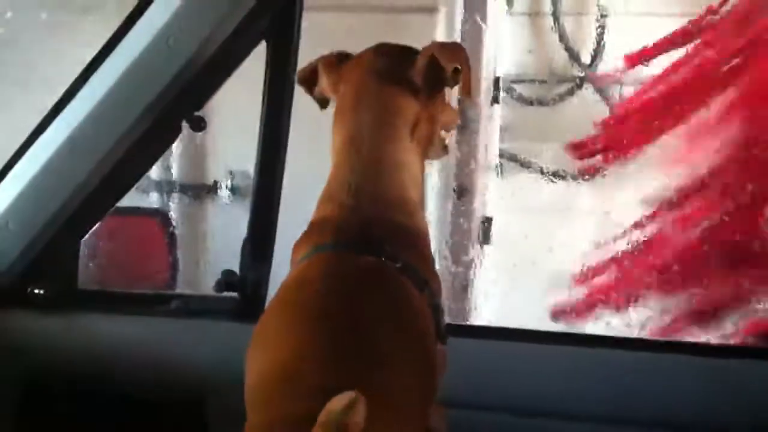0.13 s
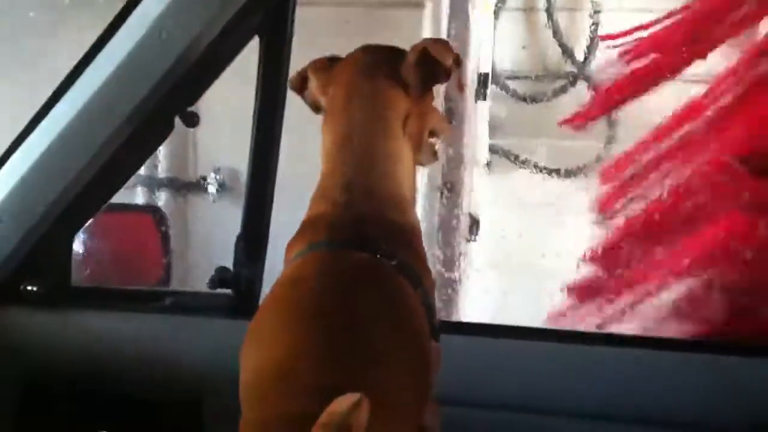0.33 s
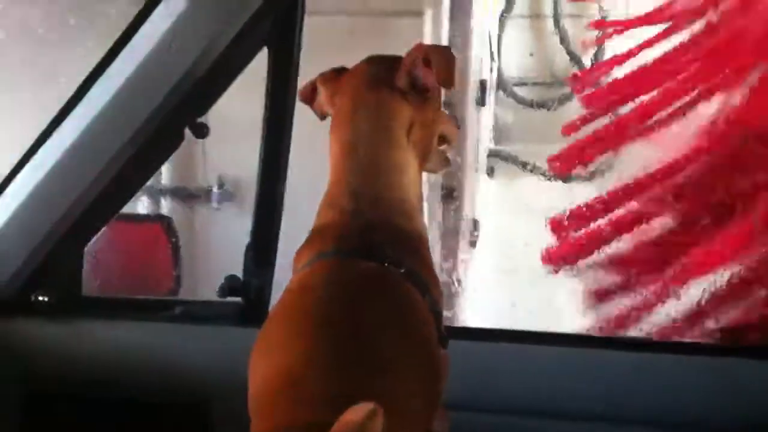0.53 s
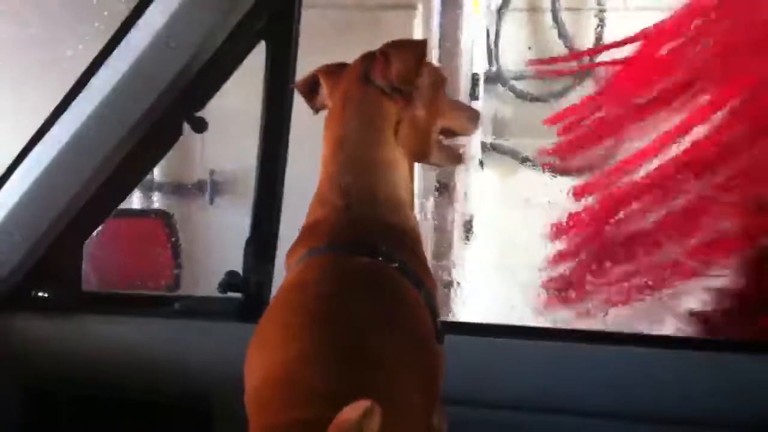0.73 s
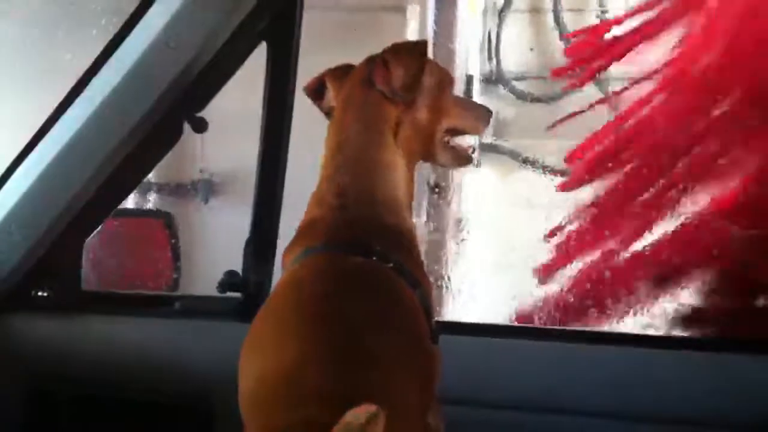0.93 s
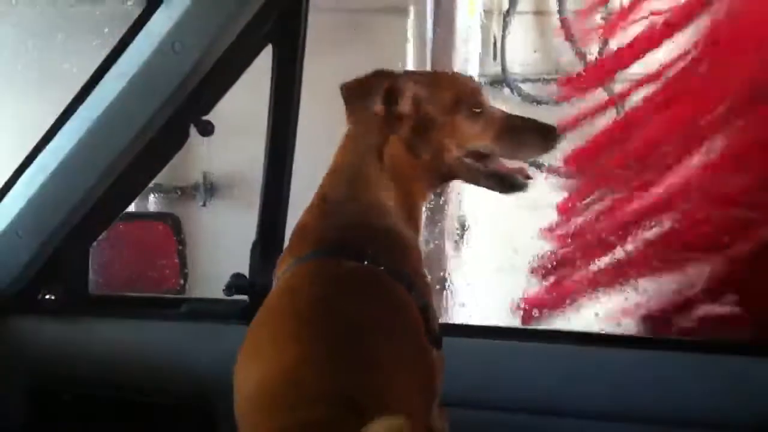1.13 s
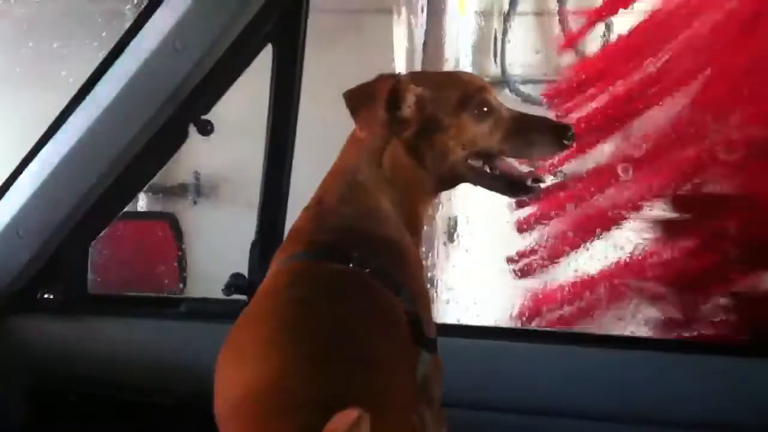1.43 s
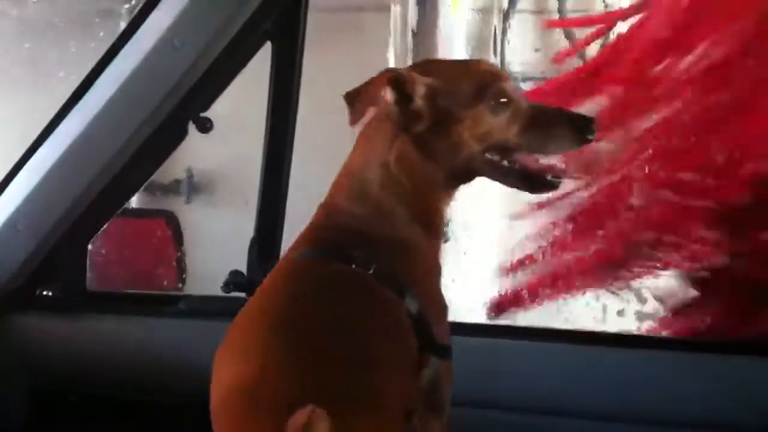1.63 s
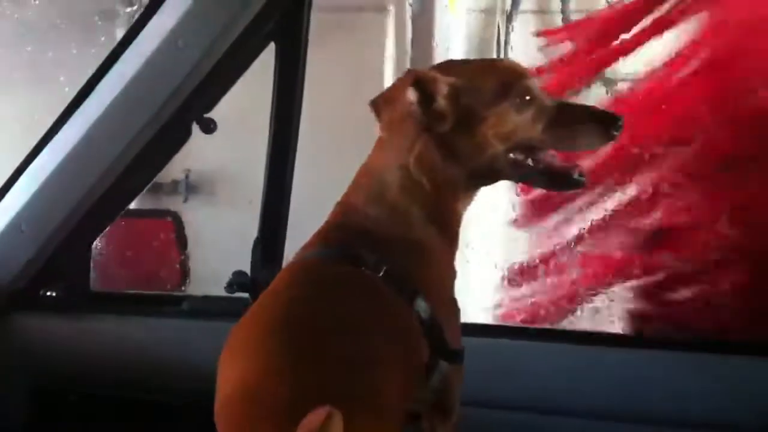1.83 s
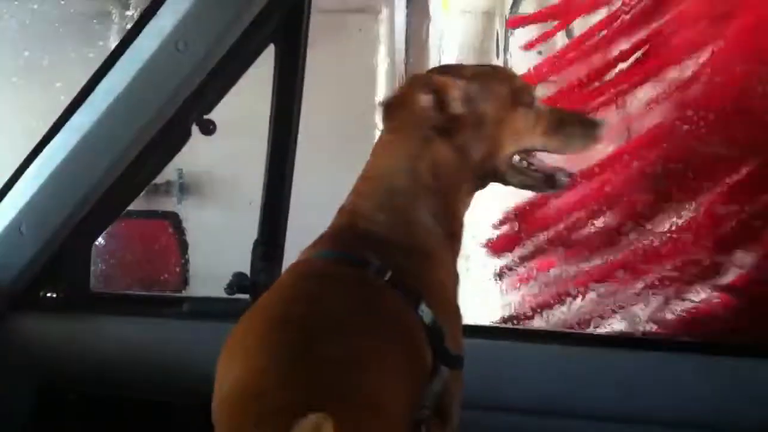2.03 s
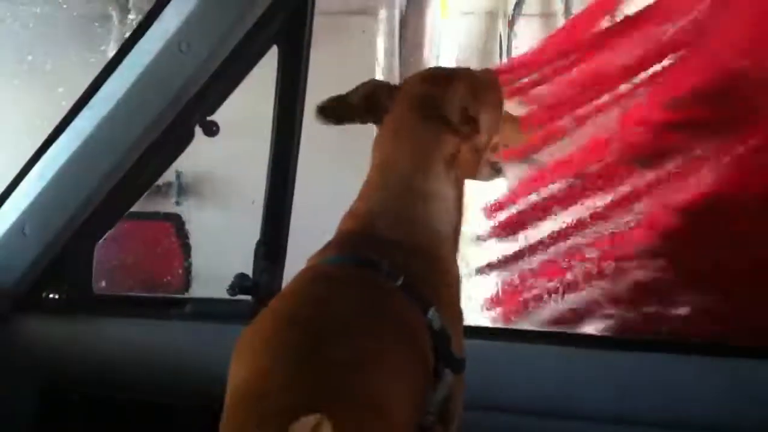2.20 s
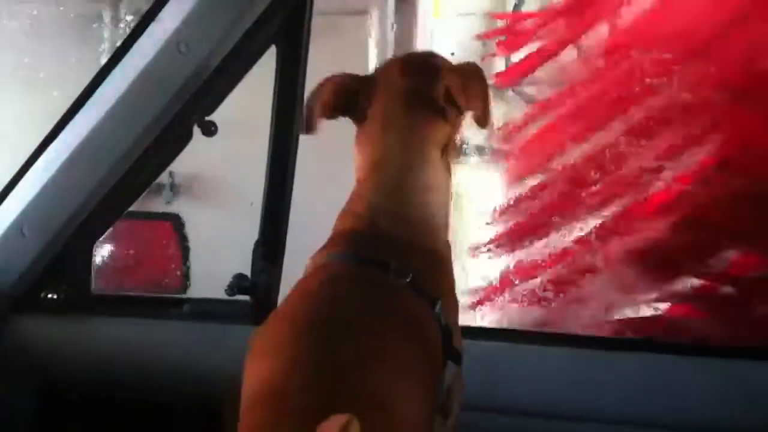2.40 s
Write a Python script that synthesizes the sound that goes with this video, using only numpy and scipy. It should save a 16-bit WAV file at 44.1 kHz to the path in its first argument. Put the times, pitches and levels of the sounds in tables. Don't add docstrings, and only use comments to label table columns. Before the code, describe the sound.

A car wash brush drums softly and rapidly on the door panels, with booming thumps, wet slaps on the windows, hissing spray and dull machinery roar, picked up by a small phone microphone inside the closed cabin.

```python
import sys
import numpy as np
from scipy import signal
from scipy.fft import rfft, irfft
from scipy.io import wavfile
from scipy.ndimage import uniform_filter1d

SR = 44100
rng = np.random.default_rng(int(sys.argv[2]) if len(sys.argv) > 2 else 0)


def volts_from_db(level):
    exponent = np.asarray(level, float) / 20
    return 10 ** exponent


def unload_wav(signal):
    wavfile.write(
        sys.argv[1],
        SR,
        np.round(np.clip(np.atleast_2d(signal).T, -1, 1) * 32767).astype(np.int16),
    )


N = 112896


def in_time(rows, column=1):
    rows = np.array(rows)
    return np.interp(np.arange(N) / SR, rows[:, 0], rows[:, column])


def rms_one(x):
    return x / np.sqrt(np.mean(x ** 2) + 1e-20)


def evened(x):
    window = int(0.05 * SR)
    power = uniform_filter1d(uniform_filter1d(x ** 2, window), window)
    share = 0.55
    return rms_one(x / (power + 1e-20) ** (share / 2))


def drift(rate_hz):
    r = np.exp(-80 * np.pi * rate_hz / SR)
    noise = rng.standard_normal(N // 40 + 2002)
    slow = signal.lfilter([1], [1, -2 * r, r * r], noise)[2000:]
    return np.interp(np.arange(N) / 40, np.arange(len(slow)), rms_one(slow))


def octaves():
    return np.log2(np.maximum(np.fft.rfftfreq(N, 1 / SR), 1))


def coloured(x, spectrum):
    hz, db = np.transpose(spectrum)
    f = octaves()
    beyond = np.maximum(np.log2(hz[0]) - f, 0) + np.maximum(f - np.log2(hz[-1]), 0)
    gain = volts_from_db(np.interp(f, np.log2(hz), db) - 24 * beyond)
    return rms_one(irfft(rfft(x) * gain, N))


def patchy(x, shared_db, own_db, rate_hz):
    half_octaves = octaves() * 2
    spectrum, together, out = rfft(x), drift(rate_hz), 0
    for k in range(8, 30):
        band = np.cos(np.pi / 2 * np.clip(half_octaves - k, -1, 1)) ** 2
        part = irfft(spectrum * band, N)
        out = out + part * volts_from_db(shared_db * together + own_db * drift(rate_hz))
    return rms_one(out)


def resonance(x, hz, width_hz):
    r = np.exp(-np.pi * width_hz / SR)
    poles = [1, -2 * r * np.cos(2 * np.pi * hz / SR), r * r]
    return signal.lfilter([(1 - r * r) / 2, 0, (r * r - 1) / 2], poles, x)


def high_pass(x, hz):
    return signal.sosfilt(signal.butter(2, hz, "high", fs=SR, output="sos"), x)


def grains(per_s, spread_db):
    sizes = volts_from_db(spread_db * np.minimum(rng.exponential(1, N), 5)) * rng.choice([-1, 1], N)
    return sizes * (rng.random(N) < per_s / SR) + 1e-18


def swell_and_fall(t, rise_s, fall_s):
    return (1 - np.exp(-t / rise_s)) ** 2 * np.exp(-t / fall_s)


def bursts(s, db, rise_s, fall_s):
    t = np.maximum(np.arange(0, N, 16) / SR - s[:, None] + rise_s, 0)
    shape = swell_and_fall(t, rise_s, fall_s)
    level = np.sqrt(volts_from_db(2 * db) @ shape ** 2) / shape.max()
    return np.interp(np.arange(N) / 16, np.arange(t.shape[1]), level)


# (frequency [Hz], density [dB per Hz])
ROAR_SPECTRUM = [(15, -66), (25, -25), (48, -28.5), (121, 4), (156, 2.5), (375, -14.5), (519, -11.5),
                 (782, -12), (1500, -40.5), (1950, -39), (3300, -120)]


def roar(push_db):
    noise = coloured(rng.standard_normal(N), ROAR_SPECTRUM)
    noise = evened(patchy(noise, shared_db=-0.5, own_db=3.5, rate_hz=17.6))
    level_db, follows_push = -31.5, 0.75
    return volts_from_db(level_db + follows_push * (push_db - push_db.mean())) * noise


# (time [s], level [dB])
SWEEP = [
    (0.0, -33),
    (0.27, -37),
    (0.7, -36),
    (1.0, -35),
    (2.13, -38),
    (2.56, -36.5),
]
# (frequency [Hz], density [dB per Hz])
SPRAY_SPECTRUM = [(350, -16), (600, 0.5), (966, -1.5), (1470, -6.5), (2340, -11), (5160, -23), (8890, -29),
                  (13400, -39), (15500, -41)]


def spray():
    drops = rms_one(grains(per_s=1800, spread_db=-8))
    mix = rng.standard_normal(N) + volts_from_db(-21.5) * drops
    hiss = patchy(coloured(mix, SPRAY_SPECTRUM), shared_db=0.5, own_db=0.4, rate_hz=13.7)
    return volts_from_db(in_time(SWEEP) + 0.5) * hiss


# (time [s], peak level [dB], ring [Hz], ring width [Hz])
TICKS = [(0.1017, -39, 8000, 910), (.12, -38, 4970, 900), (0.337, -46, 7650, 900), (.4685, -44, 5450, 900),
         (1.3654, -45, 5600, 900), (1.4237, -40.5, 12700, 1000), (1.5858, -46, 14700, 1500),
         (1.984, -44, 5700, 900), (2.182, -39, 8700, 500), (2.186, -39, 8500, 550),
         (2.199, -56, 13500, 1200)]


def ticks():
    noise = rms_one(high_pass(rng.standard_normal(N), 4500))
    level_db, ring_db, rise_s, fall_s = -9.5, 2, 0.0015, 0.0038
    out = 0
    for s, db, hz, width_hz in TICKS:
        voice = noise + volts_from_db(ring_db) * rms_one(resonance(noise, hz, width_hz))
        out = out + voice * bursts(np.array([s]), np.array([db + level_db]), rise_s, fall_s)
    return out


# (time [s], level [dB], ring [Hz], ring width [Hz])
RAPS = [
    (1.603, -34.5, 590, 500),
    (1.669, -40, 2100, 704),
    (1.9817, -31.5, 2200, 1200),
    (2.2763, -33.5, 1900, 300),
]


def raps():
    noise = rng.standard_normal(N)
    out = 0
    for s, db, hz, width_hz in RAPS:
        ring = evened(resonance(resonance(noise, hz, width_hz), hz, width_hz))
        out = out + ring * bursts(np.array([s]), np.array([db]), rise_s=0.00053, fall_s=0.005)
    return out


# (time [s], splash [dB], knock [dB], brightness [dB])
SLAPS = [(0.045, -31, -30, -3.5), (0.0782, -27.5, -27.5, 8), (0.1167, -31, -40, 8.5),
         (0.1724, -30.5, -26, 3), (0.2597, -32, -26, 7), (0.291, -25.5, -34, -4), (0.3424, -32.5, -52.5, 3),
         (0.389, -30.5, -37.5, 3), (0.4266, -46.5, -29, 17.5), (0.4738, -29, -29.5, 6.5),
         (0.486, -31, -34.5, 2), (0.536, -30.5, -29.5, 1), (0.6015, -28.5, -26, 3.5),
         (0.6444, -32, -31.5, 1.5), (0.762, -31, -33, 2.5), (0.788, -24.5, -30.5, -4),
         (0.855, -26, -34.5, 3), (0.9294, -31.5, -39, 4), (0.989, -26, -34, -8), (1.017, -23.5, -36, -6),
         (1.078, -39, -31.5, 11), (1.22, -40, -26.5, 12.5), (1.271, -29.5, -33.5, -8.5),
         (1.333, -33.5, -28.5, 7), (1.3656, -24, -28, -2.5), (1.4355, -28.5, -28, -2.5),
         (1.5994, -39, -56, 3), (1.63, -26.5, -24, -2.5), (1.647, -31.5, -27.5, -2),
              (1.66, -27, -22.5, -3), (1.693, -29.5, -28.5, 3.5), (1.7446, -30.5, -30.5, 2.5),
              (1.7994, -40, -25.5, 4.5), (1.8647, -33, -28.5, -1), (1.9155, -29, -25.5, -8.5),
              (1.968, -36, -34.5, 5), (1.9889, -35, -29.5, 7.5), (2.0144, -31.5, -36, -14),
              (2.0694, -31, -35.5, -12), (2.19, -26, -27.5, -7), (2.2744, -32, -26, 3),
              (2.332, -47, -29, 16), (2.4514, -34, -28, 7), (2.4854, -36, -31.5, -15),
              (2.5297, -47.5, -30, -17)]
# (frequency [Hz], density [dB per Hz])
SPLASH_SPECTRUM = [(1470, -4), (2500, 1), (4720, -9.5), (8110, -14.5), (12100, -23), (15500, -33)]
# (frequency [Hz], density [dB per Hz])
KNOCK_SPECTRUM = [(260, -58), (450, 2.5), (538, -8), (1030, -1.5), (1360, -10.5), (2050, -6.5), (2660, -23),
                  (3800, -23.5), (4940, -45), (8360, -120)]


def slaps():
    s, splash_db, knock_db, bright_db = np.transpose(SLAPS)
    splash_db, knock_db = splash_db - 11.5, knock_db - 6.5

    splash = coloured(rng.standard_normal(N), SPLASH_SPECTRUM)
    splash = patchy(splash, shared_db=1.9, own_db=2.0, rate_hz=15)
    low = signal.sosfiltfilt(signal.butter(2, 7240, fs=SR, output="sos"), splash)
    high = splash - low

    taps = rng.standard_normal(N) + volts_from_db(-5) * rms_one(grains(per_s=1200, spread_db=0.5))
    knock = evened(patchy(coloured(taps, KNOCK_SPECTRUM), shared_db=-1.0, own_db=1.9, rate_hz=73))

    return (low * bursts(s, splash_db, rise_s=0.01, fall_s=0.011)
            + high * bursts(s, splash_db + bright_db, rise_s=0.01, fall_s=0.011)
            + knock * bursts(s, knock_db, rise_s=0.0072, fall_s=0.018))


# (time [s], peak level
# [dB], boom [Hz])
THUMPS = [(0.031, -14, 166), (0.116, -20.5, 214), (0.162, -12, 205.3), (0.199, -15.5, 187),
          (0.262, -17, 193), (0.353, -16.5, 134), (0.406, -18.5, 165), (0.475, -20, 147), (0.528, -17, 132),
          (0.559, -18, 180), (0.606, -15.5, 217), (0.669, -14.5, 178), (0.703, -14.5, 140),
          (0.742, -17, 195), (0.788, -13, 146.7), (0.848, -15, 177), (0.893, -26, 178), (0.911, -19, 167),
          (1.029, -14.5, 211), (1.159, -20, 124), (1.221, -19, 140), (1.266, -17, 189), (1.333, -16.5, 170),
          (1.411, -14, 183), (1.462, -17.5, 174.4), (1.601, -18.5, 156), (1.658, -20.5, 194),
          (1.706, -16, 195), (1.859, -23.5, 136), (1.923, -18.5, 177), (1.992, -23, 158),
          (2.015, -18.5, 163), (2.105, -23, 231), (2.136, -19, 168), (2.196, -20.5, 152),
          (2.231, -18.5, 145), (2.319, -26, 131), (2.352, -31, 148), (2.412, -19, 164), (2.459, -21.5, 186),
          (.005, -22, 110), (0.076, -19.5, 150), (.638, -17.5, 186), (0.826, -19, 155),
               (.955, -20.5, 110), (1.06, -24, 201), (1.361, -23.5, 118), (1.501, -21.5, 157),
               (1.545, -24.5, 150), (1.759, -18.5, 161), (1.80, -21, 198.6), (2.279, -23.5, 110),
               (2.52, -22, 153.6)]


def thumps():
    out = np.zeros(N + SR)
    t = np.arange(SR // 8) / SR
    shape = swell_and_fall(t, rise_s=0.0053, fall_s=0.014)
    shape = shape / shape.max()
    for s, db, hz in THUMPS:
        start = int(s * SR)
        boom = np.sin(2 * np.pi * (hz * t + rng.random()))
        out[start:start + len(t)] += volts_from_db(db - 5) * shape * boom
    return out[:N]


# (time [s], level [dB], small panels [dB])
PUSH = [(0.0, -23, -8.5), (0.05, -24.5, -6), (0.5, -28.5, -8), (0.64, -25.5, -7.5), (0.87, -25, -10.5),
        (0.9, -25, -5.5), (1.22, -30, -6), (1.44, -24.5, -7), (1.47, -25.5, -10.5), (1.6, -32, -2.5),
        (1.71, -28, -5.5), (1.94, -27.5, -14), (1.97, -30, -2), (2.02, -23.5, -16), (2.07, -35, -1),
        (2.15, -28.5, -7), (2.32, -30, -5), (2.56, -27.5, -7)]
# (frequency [Hz], width [Hz], level [dB])
BODY = [(59, 9.8, -37), (117.4, 40, -5), (154.4, 51, -0.5), (203.6, 37.4, 3), (268, 60, -8),
        (379, 40.7, -5.5), (757, 93, -17.5), (1190, 150, -18.5), (2100, 440, -10)]


def drumming(push_db):
    cloth = signal.butter(1, 1400, fs=SR)
    beats = signal.lfilter(*cloth, grains(per_s=900, spread_db=3.5))
    big, small = 0, 0
    for k, (hz, width_hz, db) in enumerate(BODY):
        pole_width_hz = 2.08 * width_hz
        ring = resonance(resonance(beats, hz, pole_width_hz), hz, pole_width_hz)
        ring = (-1) ** k * volts_from_db(db) * ring / np.sqrt(width_hz)
        if hz < 240:
            big = big + ring
        else:
            small = small + ring
    small_db = in_time(PUSH, 2) - 1.5
    return volts_from_db(push_db + 2.5) * (volts_from_db(-6) * evened(big) + volts_from_db(small_db) * evened(small))


def scene():
    push_db = in_time(PUSH)
    background = roar(push_db) + spray()
    on_the_glass = ticks() + raps() + slaps()
    on_the_door = thumps() + drumming(push_db)
    return (background + on_the_glass + on_the_door)[None]


# (frequency [Hz], rms per step [ratio])
STEPS = [(200, 12), (450, 5), (1200, 2.5), (2000, 1.9), (3000, 1.25), (4400, .92), (5800, .75), (7200, .66),
         (9300, .58), (11300, .5), (12700, .45), (14000, .39), (15200, .33), (15800, .28)]


def phone_grain(x):
    n, k = np.arange(2048) + 0.5, np.arange(1024) + 0.5
    lead = 616
    window = np.sin(np.pi * n / 2048)[:, None]
    basis = window * np.cos(np.pi / 1024 * np.outer(n + 512, k)) / np.sqrt(512)
    halves = np.pad(x, (lead + 1024, 3072))[:(N // 1024 + 4) * 1024].reshape(-1, 1024)
    lines = np.hstack([halves[:-1], halves[1:]]) @ basis

    power = lines ** 2
    banded = np.repeat(power.reshape(len(lines), -1, 32).mean(axis=2), 32, axis=1) + 1e-20
    usual = uniform_filter1d(power.mean(axis=0), size=16) + 1e-20
    local = np.where(k < 96, uniform_filter1d(power, size=8, axis=1) + 1e-20, banded)
    follows = 0.55
    fineness = np.interp(k * SR / 2048, *np.transpose(STEPS))
    step = np.sqrt(local ** follows * usual ** (1 - follows)) / fineness

    rungs = np.floor((abs(lines) / step) ** 0.75 + 0.4054)
    kept = np.sign(lines) * step * rungs ** (4 / 3) * (k < 732)
    nearby = np.sqrt(uniform_filter1d(kept ** 2, size=9, axis=1).clip(0))
    kept = kept + volts_from_db(-21) * nearby * rng.standard_normal(kept.shape)
    frames = kept @ basis.T
    return (frames[1:, :1024] + frames[:-1, 1024:]).ravel()[lead:lead + N]


def band_limit(x):
    return signal.sosfilt(signal.butter(12, 15690, fs=SR, output="sos"), x)


def record(dry):
    mix = phone_grain(high_pass(dry[0], 68.7))[None]
    return band_limit(mix)


dry = scene()
out = record(dry)
unload_wav(out)
```